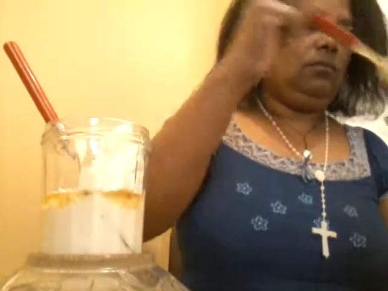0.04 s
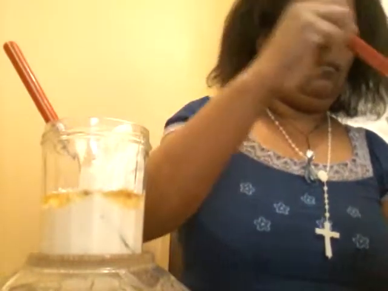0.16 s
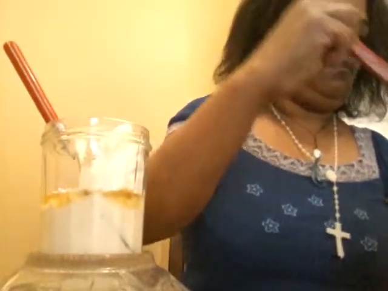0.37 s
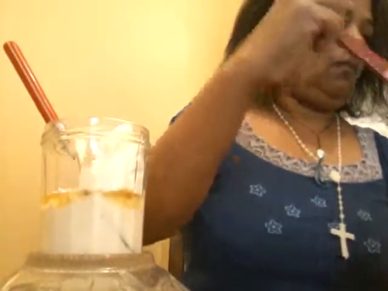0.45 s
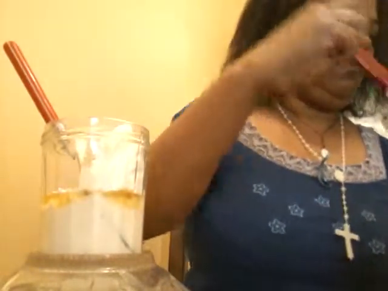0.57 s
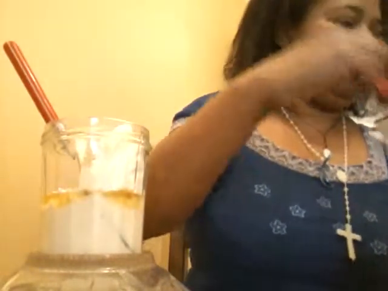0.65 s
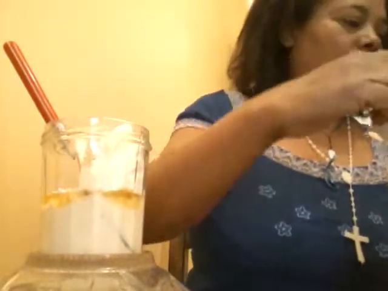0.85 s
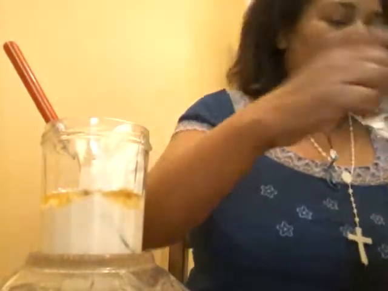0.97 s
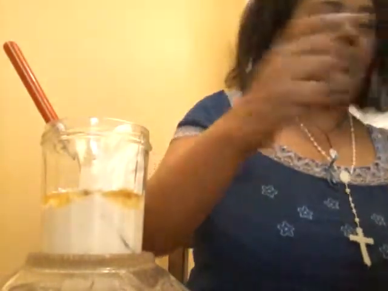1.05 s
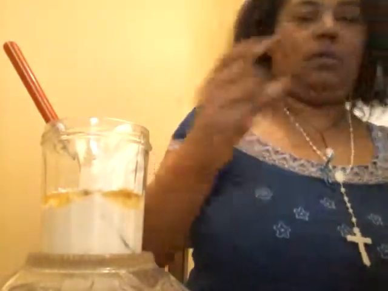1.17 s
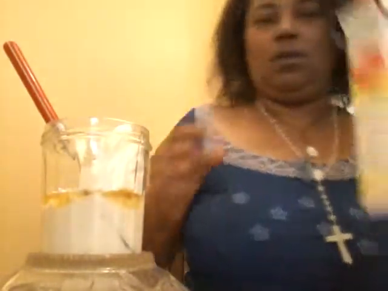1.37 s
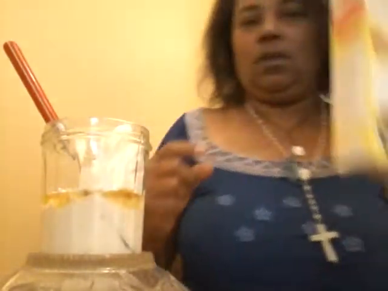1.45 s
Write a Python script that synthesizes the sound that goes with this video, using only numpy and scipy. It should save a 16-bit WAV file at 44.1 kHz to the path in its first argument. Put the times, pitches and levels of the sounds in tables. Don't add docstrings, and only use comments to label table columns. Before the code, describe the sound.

A metal spoon lands in a filled glass jar, scrapes roughly along its wall with bright clinks and damped knocks, then lifts away; small hard room with low hum, heard close through a thin, treble-peaked camera microphone.

```python
import sys
import numpy as np
from scipy import signal
from scipy.io import wavfile
from scipy.ndimage import uniform_filter1d

SR = 44100
rng = np.random.default_rng(int(sys.argv[2]) if len(sys.argv) > 2 else 0)


def bounce(signal):
    frames = np.transpose(np.atleast_2d(signal))
    limited = np.clip(frames, -1, 1)
    pcm = np.round(limited * 32767).astype(np.int16)
    wavfile.write(sys.argv[1], SR, pcm)


def amplitude_ratio(level_db):
    exponent = np.asarray(level_db, float) / 20
    return 10 ** exponent


N = 66150
PORT_HZ = 6690


def evened(x):
    return x / np.sqrt(np.mean(x ** 2) + 1e-20)


def read(points, hz):
    f, value = np.transpose(points)
    return np.interp(np.log(hz + 1), np.log(f + 1), value)


def coloured(x, points):
    log_gain = np.log(amplitude_ratio(read(points, abs(np.fft.fftfreq(8192, 1 / SR)))))
    phase = -signal.hilbert(log_gain).imag
    taps = np.fft.ifft(np.exp(log_gain + 1j * phase)).real[:4096]
    return signal.oaconvolve(x, taps)[:len(x)]


def resonate(x, hz, width_hz):
    turn = np.exp(2j * np.pi * np.cumsum(hz * np.ones(len(x))) / SR)
    r = np.exp(-np.pi * width_hz / SR)
    return 2 * (turn * signal.lfilter([1 - r], [1, -r], x / turn)).real


def add(mix, start_s, sound):
    part = mix[round(start_s * SR):][:len(sound)]
    part += sound[:len(part)]


def air():
    # pitch_hz, level_db
    noise_colour = [(40, 6.5), (150, 8), (500, 2.5), (1300, -13), (2500, -11), (4000, -23), (5400, -16.5),
                    (6000, -28.5)]
    # pitch_hz, level_db (rms)
    hum_partials = [(96.9, -73.5), (150.7, -73)]
    noise_db, fade_db_per_s, swell_db = -46, -2, 0.7
    hum_gain_db, waver_db = 15, 1.5
    port_db, port_fade_db_per_s, port_width_hz = -61.5, -8, 1000
    t = np.arange(N) / SR
    swell, waver = uniform_filter1d(rng.standard_normal((2, N)), 3000)
    hum = np.zeros(N)
    for hz, db in hum_partials:
        level = amplitude_ratio(db + hum_gain_db + waver_db * evened(waver))
        hum += level * np.sqrt(2) * np.sin(2 * np.pi * hz * t)
    port = resonate(rng.standard_normal(N), PORT_HZ, port_width_hz)
    port = evened(resonate(port, PORT_HZ, port_width_hz))
    noise = evened(coloured(rng.standard_normal(N), noise_colour))
    noise *= amplitude_ratio(noise_db + fade_db_per_s * t + swell_db * evened(swell))
    return noise + hum + amplitude_ratio(port_db + port_fade_db_per_s * t) * port


def drag():
    # time_s, effort_db, wall_weight_db (extra weight on the jar wall)
    stroke = [(.06, -80, 22), (0.093, -40, -5.5), (.164, -40, 1.5), (0.26, -29.5, 2.5), (0.271, -19.5, -1),
              (0.408, -35.5, 2.5), (0.4334, -31, 9), (0.435, -27, 3.5), (0.546, -33, 3), (0.61, -44.5, 6),
              (0.646, -25.5, 3.5), (0.692, -29, 2.5), (0.838, -20.5, 2.5), (0.898, -32, 4.5), (1, -44, 4),
              (1.03, -32.5, 4.5), (1.1, -47.5, -16.5), (1.2, -78, 3.5)]
    # pitch_hz, width_hz, level_db
    jar_modes = [(483, 160, -36), (770, 186, 2), (950, 342, -1.5), (1510, 393, -7), (2380, 355, -6),
                 (3280, 700, -4)]
    # pitch_hz, level_db
    grit_colour = [(60, -5.5), (150, -3.5), (400, 8.5), (1500, -1.5), (4000, 7), (8000, 0), (12000, -2)]
    slips_per_s, slip_spread_db, smear_db, judder_db = 2500, 2.5, -6, 2.5
    grit_db, jar_db, jar_wander, land_s = 9.5, 8.5, 0.06, 0.012
    t = np.arange(N) / SR
    s, effort_db, weight_db = np.transpose(stroke)
    draw, size = rng.random(N), rng.exponential(1, N)
    sign, hiss = rng.standard_normal(N), rng.standard_normal(N)
    slips = (draw < slips_per_s / SR) * amplitude_ratio(slip_spread_db * np.minimum(size, 3.5)) * np.sign(sign)
    judder = amplitude_ratio(judder_db * evened(uniform_filter1d(uniform_filter1d(hiss, 200), 200)))
    rub = evened(judder * (evened(slips) + amplitude_ratio(smear_db) * hiss))
    wander = 1 + jar_wander * evened(uniform_filter1d(uniform_filter1d(sign, 1500), 1500))
    jar = np.zeros(N)
    for k, (hz, width_hz, db) in enumerate(jar_modes):
        jar += (-1) ** k * amplitude_ratio(db) * resonate(rub, hz * wander, width_hz)
    jar = amplitude_ratio(jar_db + np.interp(t, s, weight_db)) * evened(jar)
    grit = amplitude_ratio(grit_db) * evened(coloured(rub, grit_colour))
    touch = np.clip((t - s[0]) / land_s, 0, 1) * np.clip((s[-1] - t) / land_s, 0, 1)
    return touch * amplitude_ratio(np.interp(t, s, effort_db)) * (grit + jar)


def knocks():
    # start_s, peak_db, pitch_hz, hardness_db
    bowl_hits = [(.0655, -51, 685, -5), (0.0892, -27, 770, -15.5), (.155, -32.5, 700, -15),
                 (.268, -27.5, 882, 6.5), (0.291, -48, 840, -16), (.307, -24, 820, 2),
                 (.325, -35.5, 810, -12), (.391, -31, 846, -3.5), (.4685, -23, 797, 5),
                 (0.629, -25.5, 820, -13.5), (.646, -23, 838, -3), (0.79, -18, 950, -3.5),
                 (.822, -24.5, 886, -14.5), (.832, -19, 775, -22), (.859, -22.5, 896, 4),
                 (.867, -24.5, 730, -11), (.943, -25, 731, -8), (1.015, -25.5, 863, -25),
                 (1.03, -26.5, 873, -26), (1.179, -60, 776, 7), (1.283, -49, 828, -10),
                 (1.394, -55, 700, -12)]
    knock_db, t60_s, rise_s = 17.5, 0.024, 0.0015
    out, t = np.zeros(N), np.arange(2000) / SR
    fall_db = -60 * t / t60_s
    rise = np.sin(np.pi / 2 * np.minimum(t / rise_s, 1)) ** 2
    detunings = rng.uniform(0.93, 1.2, (len(bowl_hits), 4))
    for (s, db, hz, hard_db), detune in zip(bowl_hits, detunings):
        ring = np.sin(2 * np.pi * hz * t)
        ring += amplitude_ratio(-11.5) * np.sin(2 * np.pi * hz * 1.2 * detune[3] * t)
        ring -= amplitude_ratio(-10.5) * np.sin(2 * np.pi * hz * 0.567 * t)
        hard = np.zeros(len(t))
        for ratio, u in zip((1.8, 2.6, 3.7), detune):
            hard += amplitude_ratio(-3.5 * ratio) * np.sin(2 * np.pi * hz * ratio * u * t)
        hard *= amplitude_ratio(hard_db + 8 + 1.57 * fall_db)
        add(out, s, amplitude_ratio(db + knock_db) * rise * (amplitude_ratio(fall_db) * ring + hard))
    return out


def ticks():
    # start_s, peak_db, pitch_hz, ring_ms, chatter_db
    edge_hits = [(.0665, -51, 6900, 1.6, 0), (.0888, -37, 7080, 2.4, 18), (.1243, -33, 6700, 2.0, -4),
                 (.187, -33, 6980, 1.5, 0), (.2698, -12.5, 6700, 1.5, 9), (.2765, -20, 7330, 1.3, 2),
                 (.2817, -6, 6720, 1.5, -4), (.2905, -21, 7000, 1.4, 6), (.312, -7, 6600, 1.2, 4),
                 (.4357, -24, 7000, 2.2, 19), (.4445, -23, 6800, 1.1, 14), (.6445, -22, 6900, 2.1, 9),
                 (.701, -23, 6950, 1.1, 0), (.72, -23, 6800, 1.1, 0), (.758, -21, 6900, 1.7, 3),
                 (.783, -21, 6900, 2.1, 0), (.7915, -13, 7300, 2.2, 5), (.8125, -12.5, 6400, 1.2, 11),
                 (.8165, -17, 7500, 1.3, 6), (.8315, -7.5, 6900, 1.2, 2), (.8405, -18, 6500, 1.4, 4),
                 (.859, -18, 6900, 1.2, 8), (.8675, -15, 7000, 1.1, 4), (1.0285, -29, 6760, 2.4, 9)]
    tick_db, rise_s, crack_gap_hz = 0.5, 0.00079, 3000
    out, t = np.zeros(N), np.arange(600) / SR
    noises = rng.standard_normal((len(edge_hits), 600))
    for (s, db, hz, ms, chatter_db), noise in zip(edge_hits, noises):
        shape = np.minimum(t / rise_s, 1) * np.exp(-(t * 1000 / max(ms, 0.3)) ** 2)
        ring = np.sin(2 * np.pi * hz * t)
        crack = noise - resonate(noise, PORT_HZ, crack_gap_hz)
        add(out, s, amplitude_ratio(db + tick_db) * shape * (ring + amplitude_ratio(chatter_db) * crack))
    return out


def thuds():
    # start_s, peak_db, pitch_hz
    rocks = [(0.099, -76.5, 141), (0.149, -41, 140), (0.279, -35.5, 195), (0.299, -40, 98),
             (0.42, -51, 211), (0.637, -44, 148), (0.757, -36, 142), (0.791, -42, 145), (0.851, -39, 86.1),
             (0.931, -52, 85), (1.012, -41.5, 140), (1.107, -58.5, 152), (1.169, -48, 151)]
    thud_db, t60_s, rise_s = 10.5, 0.12, 0.0027
    out, t = np.zeros(N), np.arange(9000) / SR
    for s, db, hz in rocks:
        shape = amplitude_ratio(db + thud_db - 60 * t / t60_s) * np.minimum(t / rise_s, 1)
        add(out, s, shape * np.sin(2 * np.pi * hz * t))
    return out


def room(x):
    # pitch_hz, t60_s
    decay_times = [(100, 1), (800, 0.38), (3000, 0.46), (7000, 0.36), (12000, 0.23)]
    taps, starts = np.zeros(SR), np.arange(130, SR - 20, 20)
    taps[starts + rng.integers(0, 20, len(starts))] = rng.choice([-1., 1.], len(starts))
    hz, t, z = signal.stft(taps, SR, nperseg=256)
    decay = amplitude_ratio(-60 * t / read(decay_times, hz)[:, None])
    tail = signal.istft(z * decay, SR, nperseg=256)[1]
    return signal.fftconvolve(x, tail / np.linalg.norm(tail))[:N]


def scene():
    spoon = drag() + ticks() + knocks() + thuds()
    room_db = -7
    return (spoon + amplitude_ratio(room_db) * room(spoon) + air())[None]


def gate(x):
    from_hz, gate_db, spread_db, peak_db = 10000, -54.5, 4, 5
    follow, tilt_db_per_octave = 0.66, 3.5
    hz, t, z = signal.stft(x, SR, nperseg=2048)
    band, starts = np.arange(len(hz)) // 12, np.arange(0, len(hz), 12)
    bin_power = abs(z) ** 2
    band_power = np.add.reduceat(bin_power, starts, axis=0) / 12
    frame_db = 10 * np.log10(bin_power.sum(0) + 1e-12)
    tilt_db = tilt_db_per_octave * np.log2(hz[starts, None] / from_hz + 1e-3)
    spread = spread_db * rng.standard_normal(band_power.shape)
    limit = amplitude_ratio(gate_db + tilt_db + follow * frame_db + spread) ** 2
    loud_band = (band_power > limit)[band]
    tall_bin = bin_power > limit[band] * amplitude_ratio(peak_db)
    keep = loud_band | tall_bin | (hz < from_hz)[:, None]
    return signal.istft(z * keep, SR, nperseg=2048)[1][:N]


def roll_off(x):
    return signal.sosfilt(signal.butter(12, 13000, fs=SR, output="sos"), x)


def record(dry):
    # pitch_hz, level_db
    mic_response = [(40, -23.5), (90, -17), (4900, -20.5), (5900, -13), (6600, -2), (7300, -2),
                    (8300, -13.5), (12000, -20)]
    edge_hz = 11950
    edge = signal.firwin(511, edge_hz, window=("kaiser", 9), fs=SR)
    heard = signal.oaconvolve(coloured(dry[0], mic_response), edge, "same")
    mix = gate(heard)[None]
    return roll_off(mix)


dry = scene()
out = record(dry)
bounce(out)
```